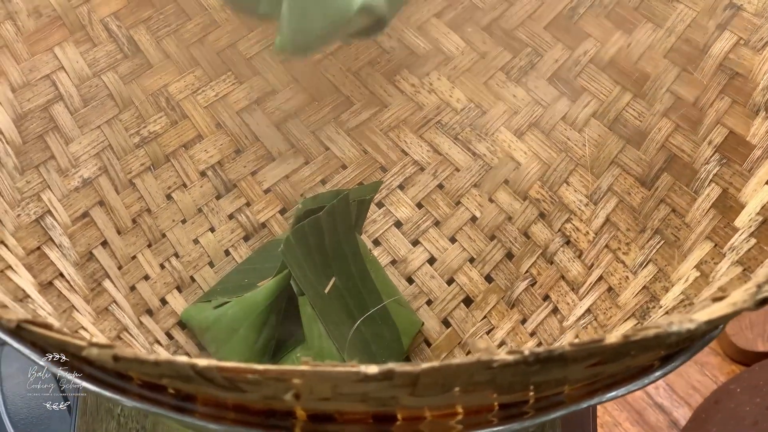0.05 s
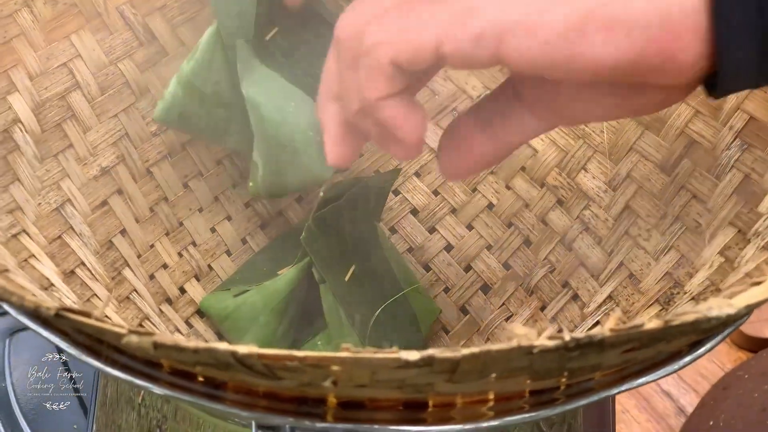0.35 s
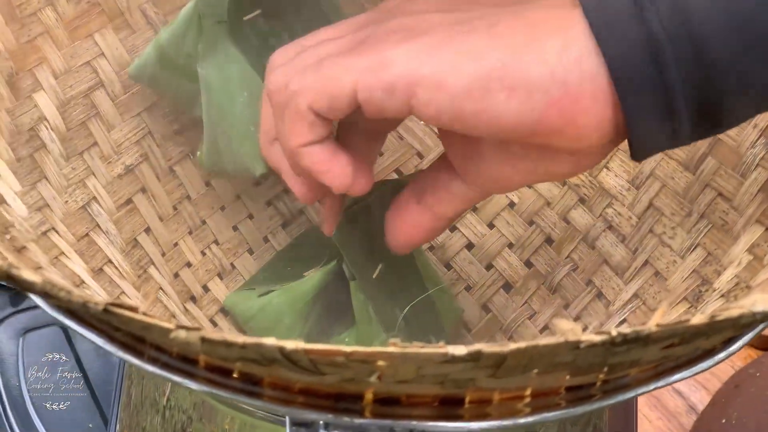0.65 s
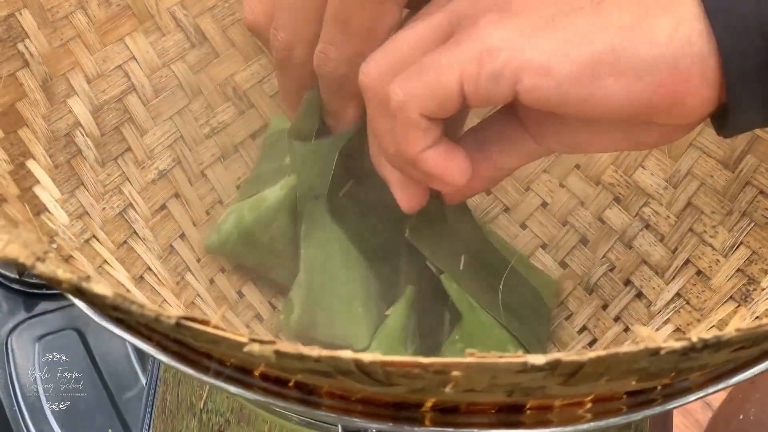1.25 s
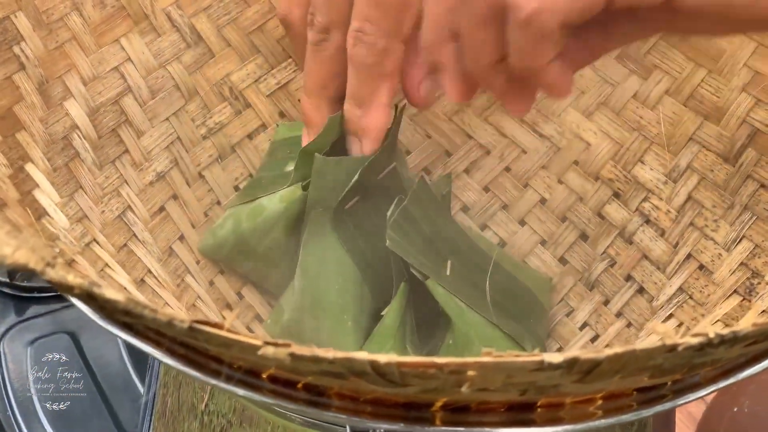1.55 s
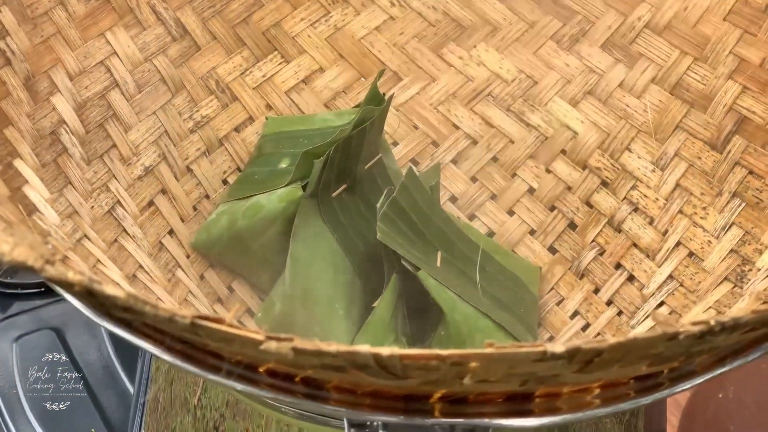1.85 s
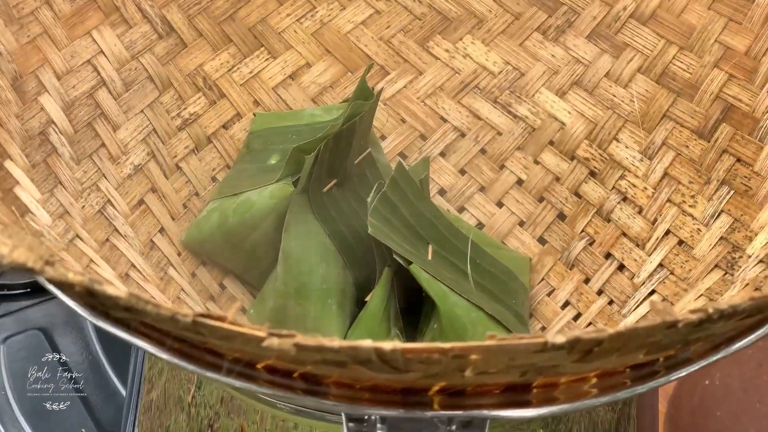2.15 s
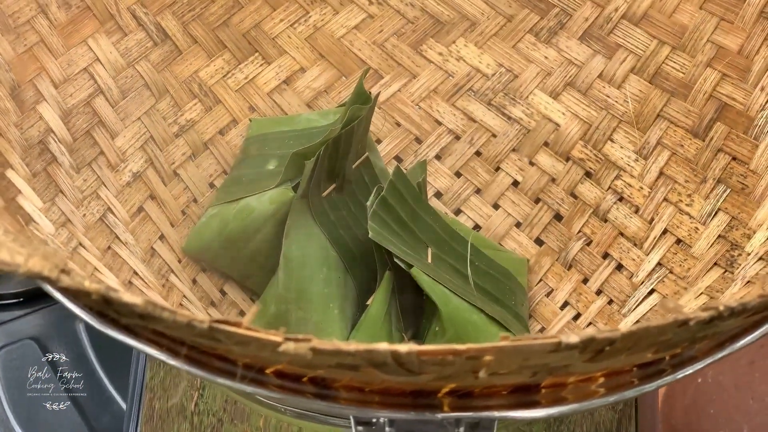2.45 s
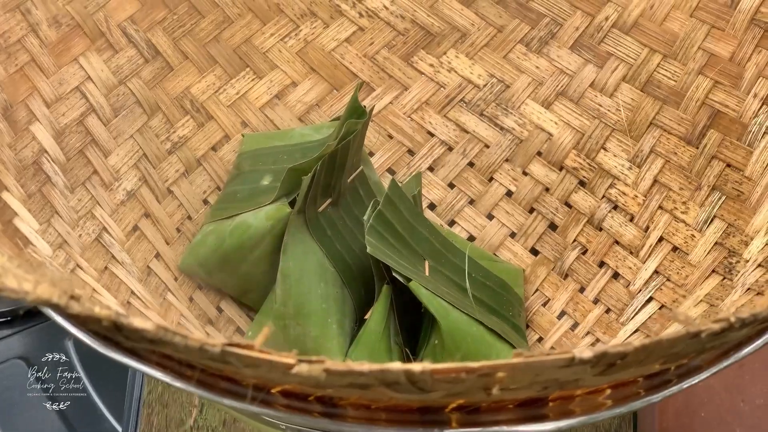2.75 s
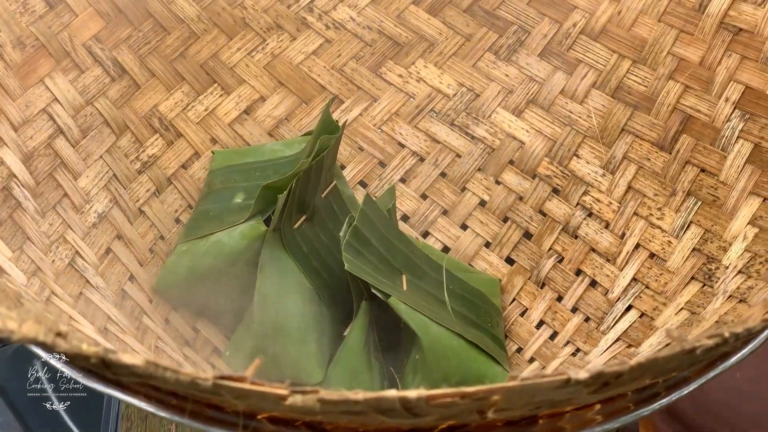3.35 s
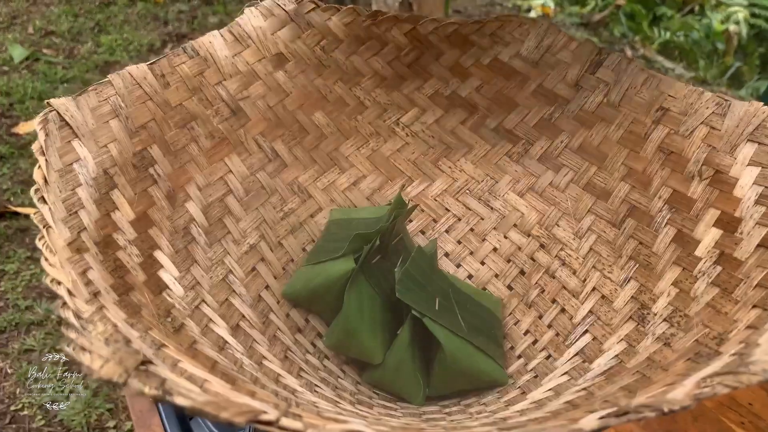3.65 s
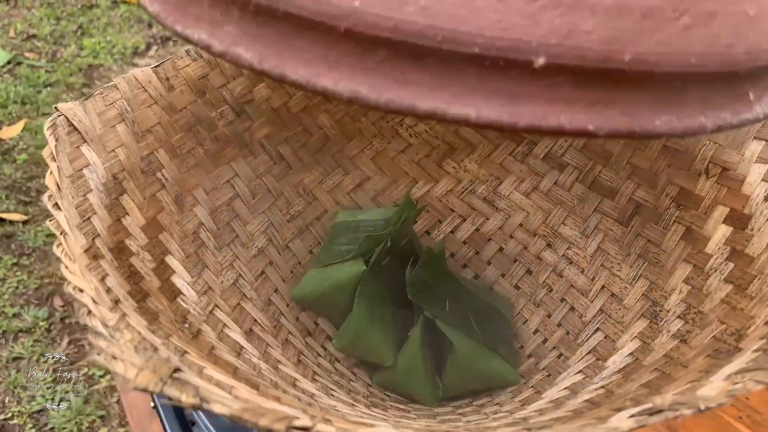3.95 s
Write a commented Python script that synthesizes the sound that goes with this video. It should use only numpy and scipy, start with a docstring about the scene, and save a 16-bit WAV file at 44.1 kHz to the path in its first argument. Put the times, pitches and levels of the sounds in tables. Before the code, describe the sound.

Boiling water pops and softly booms under a steaming basket, close to the microphone, with steady flame rumble and hiss. Leaf parcels faintly brush the weave early on. High cicadas whine outdoors, dropping away near the end.

```python
"""Steaming basket outdoors

Close on a woven basket over a burner, a little right of centre: the flame rumbles, the boiling pot booms
at one hollow note, bubbles pop, steam hisses and leaf parcels brush the weave. Two cicadas click fast
enough to whine, over a far insect chorus. Near the end the microphone jumps back from the basket:
the hiss softens and the cicadas all but vanish."""
import sys
import numpy as np
from scipy import signal
from scipy.fft import rfft, irfft
from scipy.io import wavfile

SR = 44100
rng = np.random.default_rng(int(sys.argv[2]) if len(sys.argv) > 2 else 0)


def dump_mix(stems):
    """Bounce the given channels to the path in sys.argv[1] as a 16-bit WAV at rate SR."""
    frames = np.atleast_2d(stems).T  # one column per channel
    limited = np.clip(frames, -1, 1)  # hard clip at full scale
    pcm = np.round(limited * 32767).astype(np.int16)
    wavfile.write(sys.argv[1], SR, pcm)


N = 176400

# far insect chorus (frequency [Hz], relative level [dB])
CHORUS_COLOUR = [(4300, -48), (5100, -16.5), (5400, 7.5), (5680, 0.5), (5950, 5.5), (6300, 0.5),
                 (6650, 6.5), (7000, 2.5), (7250, 4), (7550, -2), (7900, 3.5), (8700, -52)]
# its stereo image (frequency [Hz], left-right likeness [-1 to 1])
CHORUS_LIKENESS = [(5200, -0.77), (5800, -0.06), (6300, 0.23), (6700, 0.37), (7100, -0.34), (7600, -0.42)]
# single far insects (pitch [Hz], level [dB])
SINGERS = [(5660, -63.5), (6640, -64.5), (6950, -63.5), (7420, -65)]
# rasp of a shrill insect (time [s], level [dB])
SHRILL_LEVEL = [(.8, -82), (.92, -61), (1.16, -58), (1.32, -60), (1.48, -70), (1.62, -96), (3.58, -78),
                (3.63, -62), (4, -69)]
# shrill top of the nearest cicada (time [s], relative level [dB])
NEAREST_TOP_LEVEL = [(0.0, -58), (0.09, -55.5), (0.14, -54), (0.27, -54), (0.34, -64), (0.47, -54),
                     (0.6, -57.5), (0.65, -60.5), (0.76, -54), (0.93, -63), (1.01, -52.5), (1.17, -69.5),
                     (1.28, -50.5), (1.52, -54), (1.57, -63), (1.68, -49), (1.78, -55.5), (1.86, -51.5),
                     (1.91, -55.5), (2.0, -50), (2.06, -61), (2.26, -51), (2.33, -57.5), (2.47, -57),
                     (2.52, -57.5), (2.62, -55.5), (2.85, -61), (2.9, -55.5), (2.99, -65), (3.05, -58),
                     (3.12, -62), (3.27, -58.5), (3.35, -63), (3.49, -63), (3.53, -52), (3.58, -60.5)]
# second cicada, farther off (time [s], level [dB])
SECOND_LEVEL = [(0, -45), (.5, -40.5), (.72, -55), (.92, -44), (1.75, -43), (2.17, -49), (2.33, -40),
                (2.5, -57), (2.8, -43.5), (3.6, -51)]
# overtones that each cicada's body favours
# (multiple of the click rate, gain of the nearest [dB], gain of the second [dB], left lead [rad])
OVERTONES = [(10, -16.5, -12, -2.5), (11, -23, -28, -3), (20, -20, -25, 6), (30, -22.5, -36, 4),
             (39, -37, -26, 7), (40, 4.5, 3.5, -2.0), (41, -30, -5, 6), (42, -28, -18, -10.5)]
# leaves brushing the weave (time [s], half length [s], level [dB])
RUSTLES = [(0.153, .015, -51), (0.62, 0.014, -55), (1.28, 0.04, -54)]
# leaf on basket (frequency [Hz], relative level [dB])
RUSTLE_COLOUR = [(1000, 3), (3500, 2), (8000, 6), (10000, 2), (11500, -31), (15000, -30)]
# low hum (time [s], level [dB])
HUM_LEVEL = [(0, -69), (1.5, -59.5), (2.85, -60), (3.02, -42.5), (3.2, -55), (3.5, -53), (3.7, -70),
             (4, -55)]
# steam close to the basket (frequency [Hz], relative level [dB])
STEAM_CLOSE_COLOUR = [(400, -21), (800, -1.5), (1150, 3.5), (1450, -2), (1800, 2), (1980, -1.5), (2200, 5),
                      (2650, 0.5), (3750, -1), (4020, 4.5), (4300, -2.5), (6500, -0.5), (8300, -4.5),
                      (9200, -9.5), (10200, -11), (11200, -40), (15000, -49)]
# steam from farther back (frequency [Hz], relative level [dB])
STEAM_FAR_COLOUR = [(400, -37), (800, 0), (1150, 6), (1450, -7), (1850, 3.5), (2250, 6.5), (2650, -1.5),
                    (3500, 2), (4050, -1), (4600, 0.5), (6500, 0), (8300, -8), (10300, -8.5), (11200, -30),
                    (15000, -26)]
# stereo image of the steam (frequency [Hz], left-right likeness [clipped to -1 to 1])
STEAM_LIKENESS = [(600, 0.18), (1600, 0.63), (2300, 0.38), (3000, -0.15), (4000, -0.092), (5500, 0.33),
                  (7500, -1.17), (8400, 0.66), (9000, 0.15)]
# bubbles bursting at the surface (time [s], level [dB], starting pitch [Hz])
POPS = [(0.217, -38.5, 1790), (0.265, -45, 2100), (0.62, -42.5, 1510), (0.756, -52.5, 950),
        (0.992, -42, 1160), (1.167, -40, 1780), (1.623, -40.5, 2140), (1.716, -41, 1690),
        (2.016, -43.5, 1890), (2.251, -40, 1500), (2.375, -42, 1310), (2.516, -43, 900), (2.647, -42, 1070),
        (2.886, -41, 1030)]
# noise of a burst (frequency [Hz], relative level [dB])
POP_COLOUR = [(100, -20), (250, -1), (450, 9), (800, -6.5), (1200, -9), (2100, -6.5), (3000, -14),
              (6000, -17), (9500, -46), (12000, -60)]
# large bubbles booming in the pot (time [s], level [dB], decay [s], pitch [Hz])
BOOMS = [(0.3, -35, 0.022, 286), (1.162, -34.5, 0.0099, 338), (1.522, -36.5, .014, 271.3),
         (2.353, -31, 0.023, 276.6), (2.887, -37.5, 0.019, 297.6), (3.275, -33.5, 0.023, 273.4),
         (3.397, -32, 0.0095, 285), (3.52, -33.5, 0.013, 289.4)]
# burner flame (frequency [Hz], relative level [dB])
FLAME_COLOUR = [(20, -39), (32, -20), (42, -7.5), (60, 0), (100, 1), (150, 1.5), (200, -4.5), (250, -1.5),
                (330, 4), (390, 0.5), (480, 0), (530, -5.5), (610, -7.5), (720, -14.5), (900, -32.5),
                (1500, -60)]
# strength of flame and boil together (time [s], gain [dB])
BOIL_GAIN = [(0, -0.5), (1.0, 0.65), (1.7, 0.5), (2.3, 2), (2.7, 0.5), (3.35, 2), (3.8, -0.5), (4, 1)]

STEP_BACK_S = 3.612


def undb(db):
    """Decibels to gain."""
    return 10 ** (np.asarray(db) / 20)


def unit(x):
    """Scale to rms 1."""
    return x / np.sqrt(np.mean(np.abs(x) ** 2))


def curve(rows):
    """A time table joined by straight lines."""
    times, values = np.transpose(rows)
    return np.interp(np.arange(N) / SR, times, values)


def over_hz(rows):
    """A frequency table read at every spectral bin."""
    hz, values = np.transpose(rows)
    return np.interp(np.log(np.arange(N // 2 + 1) * SR / N + 1), np.log(hz), values)


def noise(colour):
    """Noise of a given colour, rms 1."""
    return unit(irfft(rfft(rng.standard_normal(N)) * undb(over_hz(colour)), N))


def ring(hz, width_hz):
    """Noise through a steep resonance, rms 1."""
    f = np.arange(N // 2 + 1) * SR / N
    return unit(irfft(rfft(rng.standard_normal(N)) / (1 + 2j * (f - hz) / width_hz) ** 2, N))


def walk(rate_hz):
    """Smooth random wander up to about rate_hz, rms 1."""
    f = np.arange(N // 2 + 1) * SR / N
    return unit(irfft(rfft(rng.standard_normal(N)) * np.exp(-(f / rate_hz) ** 2) * (f > 0), N))


def pan(left_db):
    """Channel gains for a level difference of left over right."""
    return undb(np.array([[left_db], [-left_db]]) / 2)


def wash(colour, likeness, flicker_db, rate_hz, bands=10):
    """Stereo noise whose bands flicker, partly together and partly alone, rms 1."""
    alike = np.clip(over_hz(likeness), -1, 1)
    mid, side = (rfft(rng.standard_normal(N)) * np.sqrt(1 + s * alike) for s in (1, -1))
    spectra = np.array([mid + side, mid - side]) * undb(over_hz(colour))
    band_index = over_hz([(colour[0][0], 0), (colour[-1][0], bands - 1)])
    shared = walk(rate_hz)
    out = 0
    for k in range(bands):
        band = irfft(spectra * np.maximum(1 - abs(band_index - k), 0), N)
        out += band * undb(flicker_db * (shared + walk(rate_hz)))
    return unit(out)


def stepped_back(db):
    """Gain that drops from 1 to db as the microphone jumps back."""
    return undb(curve([(STEP_BACK_S, 0), (STEP_BACK_S + 0.0041, db)]))


def chorus():
    """Far off, many insects blend to a band, with a few narrow voices standing out."""
    crowd = undb(-53.5) * wash(CHORUS_COLOUR, CHORUS_LIKENESS, flicker_db=1, rate_hz=49)
    for hz, db in SINGERS:
        gain = undb(db + 2.2 * walk(3.6))
        crowd += gain * np.array([ring(hz, width_hz=170) for _ in range(2)])
    return crowd * stepped_back(db=-3)


def shrill_insect():
    """Dead centre, an insect rasps twice in a narrow, very high band."""
    return undb(curve(SHRILL_LEVEL)) * ring(13260, width_hz=380)


def cicada(click_hz, body_db, top_db, overtones):
    """A fast, uneven click train throbs and flutters; its body and shrill top have their own levels."""
    jitter, top_multiple = 0.001, 35
    phase = 2 * np.pi * np.cumsum(click_hz * (1 + jitter * walk(180))) / SR
    voice = 0
    for multiple, db, lead in overtones:
        waver_db = min(-db / 5, 1.6) * walk(13)
        level_db = db + (top_db if multiple > top_multiple else body_db) + waver_db
        voice += undb(level_db) * np.sin(multiple * phase + np.array([[lead], [0]]))
    flutter = undb(1.3 * walk(28))
    roughness = 0.19 * walk(410)
    throb = 0.13 * ring(145, width_hz=60)
    return voice * flutter * (1 + roughness + throb)


def near_cicadas():
    """Two cicadas near the microphone whine at almost one pitch; the farther has a weaker top."""
    t = np.arange(N) / SR
    swaying_hz = 313.6 + 1.3 * np.cos(2 * np.pi * t / 1.84)
    sinking_hz = 318.5 - 4 * t
    nearest = cicada(swaying_hz, body_db=-44, top_db=curve(NEAREST_TOP_LEVEL) + 10,
                     overtones=[(k, db, lead) for k, db, _, lead in OVERTONES])
    second = cicada(sinking_hz, body_db=curve(SECOND_LEVEL), top_db=curve(SECOND_LEVEL) - 22,
                    overtones=[(k, db, lead) for k, _, db, lead in OVERTONES])
    return (nearest + second) * stepped_back(db=-27)


def hum():
    """A low tone drifts in pitch and wavers in level."""
    gain = undb(curve(HUM_LEVEL) + 3 * walk(2.4))
    hz = 87 + 1.57 * walk(3.5)
    return gain * unit(np.sin(2 * np.pi * np.cumsum(hz) / SR))


def leaves():
    """Leaf parcels brush the weave as they are set down: short, wide swells of treble."""
    t = np.arange(N) / SR
    swell = sum(undb(db) * np.exp(-((t - at) / half_s) ** 2) for at, half_s, db in RUSTLES)
    return swell * np.array([noise(RUSTLE_COLOUR), noise(RUSTLE_COLOUR)])


def simmer():
    """Tiny bubbles ring for a few milliseconds each, rising in pitch."""
    bubbles_per_s, decay_s, glide_per_s = 88, 0.0016, 3.8
    t = np.arange(SR // 25) / SR
    shape = t * np.exp(-t / decay_s)
    out = np.zeros((2, N + len(t)))
    for when, pitch, size, side in rng.random((int(bubbles_per_s * N / SR), 4)):
        hz = 2170 * (1 + 0.132 * (2 * pitch - 1))
        phase = 2 * np.pi * hz * (t + glide_per_s * t ** 2 / 2)
        lead = np.array([[side - 0.5], [0.5 - side]])
        start = int(when * N)
        out[:, start:start + len(t)] += size ** 2 * shape * np.sin(phase + lead)
    return undb(-71.5) * unit(out[:, :N])


def steam():
    """Steam and gas hiss through the weave, softer and differently coloured from farther back."""
    far_share = curve([(STEP_BACK_S, 0), (STEP_BACK_S + 0.01, 1)])
    close = undb(-52) * wash(STEAM_CLOSE_COLOUR, STEAM_LIKENESS, flicker_db=1.09, rate_hz=30)
    far = undb(-52.5) * wash(STEAM_FAR_COLOUR, STEAM_LIKENESS, flicker_db=1.09, rate_hz=9)
    return np.sqrt(1 - far_share) * close + np.sqrt(far_share) * far


def pops():
    """Bubbles burst at the surface with a puff of noise and a rising ring; small ones come at random."""
    small_per_s, rise_s, decay_s, ring_db, glide_per_s = 26, 0.0005, 0.005, -7.5, 12.5
    grit = noise(POP_COLOUR) + 0.29 * np.array([noise(POP_COLOUR), noise(POP_COLOUR)])
    t = np.arange(SR // 6) / SR
    shape = (1 - np.exp(-t / rise_s)) * np.exp(-t / decay_s)
    small = [(when * N / SR, -54 + np.log(size + 0.13), 1405 * 2 ** (pitch - 0.5))
             for when, size, pitch in rng.random((int(small_per_s * N / SR), 3))]
    bursts, rings = np.zeros((2, N + len(t)))
    for at, db, hz in POPS + small:
        span = slice(int(at * SR), int(at * SR) + len(t))
        phase = 2 * np.pi * hz * (t + glide_per_s * t ** 2 / 2)
        bursts[span] += undb(db) * shape
        rings[span] += undb(db + ring_db) * shape * np.sin(phase)
    return bursts[:N] * grit + rings[:N]


def booms():
    """Large bubbles make the pot boom, each a short, low note."""
    rise_s = 0.007
    t = np.arange(SR // 6) / SR
    out = np.zeros(N + len(t))
    for at, db, decay_s, hz in BOOMS:
        shape = (1 - np.exp(-t / rise_s)) ** 2 * np.exp(-t / decay_s)
        start = int(at * SR)
        out[start:start + len(t)] += undb(db) * shape / shape.max() * np.sin(2 * np.pi * hz * t)
    return out[:N]


def pot_on_burner():
    """Close up, the flame rumbles and the boil keeps the pot sounding at one hollow note."""
    likeness = [(100, 0.86), (400, 0.9), (800, 0.67)]
    flame = undb(-46.5) * wash(FLAME_COLOUR, likeness, flicker_db=1.58, rate_hz=26.6)
    pot = undb(-45) * ring(274.5, width_hz=45.2)
    return (flame + pot) * undb(curve(BOIL_GAIN))


def scene():
    """The stove a little to the right of the microphone, insects all around."""
    hiss = (steam() + chorus()) * pan(left_db=-0.5)
    around = near_cicadas() + shrill_insect() + simmer() + leaves()
    stove = (pot_on_burner() + hum() + pops() + booms()) * pan(left_db=-1.4)
    return hiss + around + stove


def record(dry):
    """The recorder cuts the top steeply above 15.7 kHz."""
    return signal.sosfilt(signal.ellip(8, 0.2, 70, 15700, fs=SR, output="sos"), dry)


dry = scene()
out = record(dry)
dump_mix(out)
```